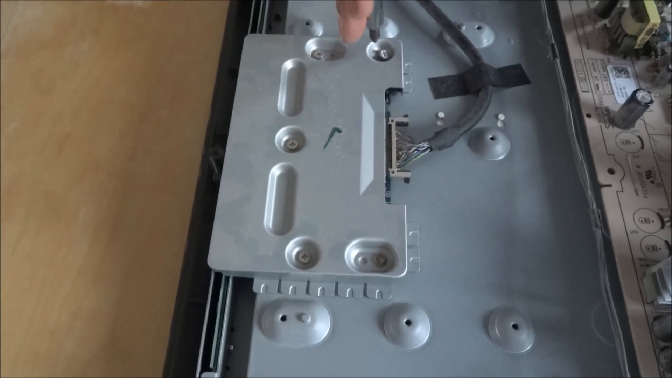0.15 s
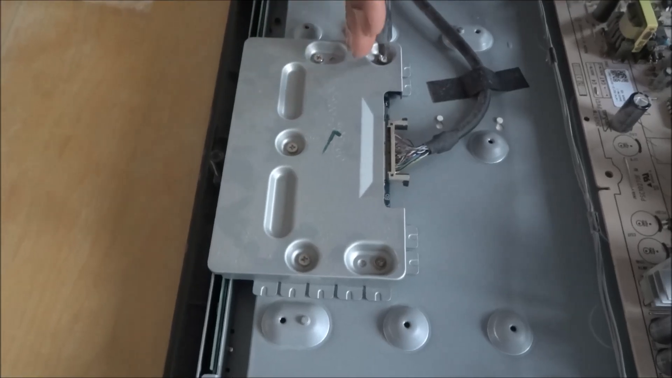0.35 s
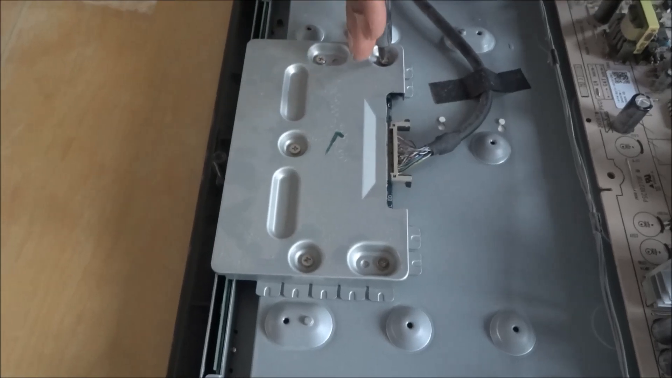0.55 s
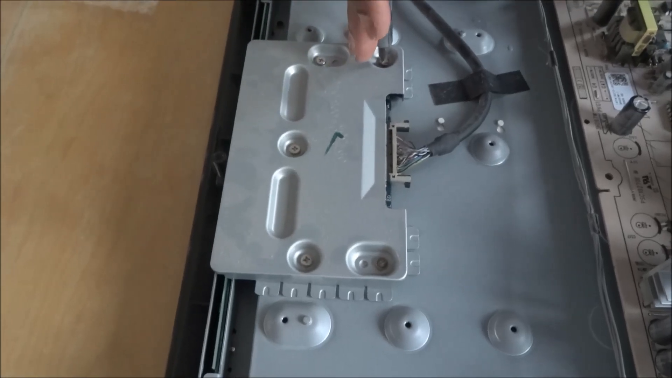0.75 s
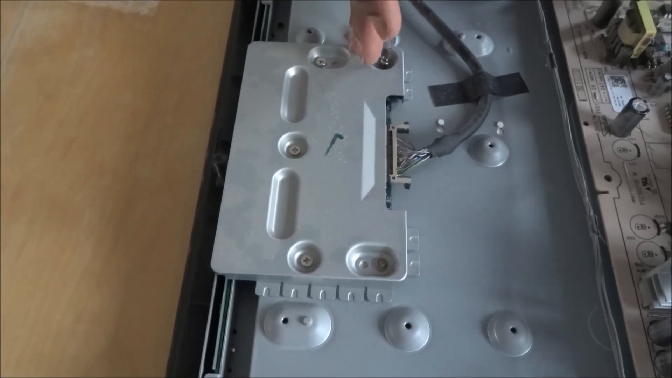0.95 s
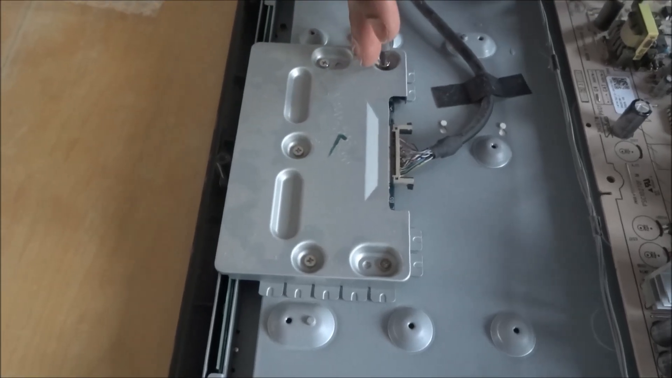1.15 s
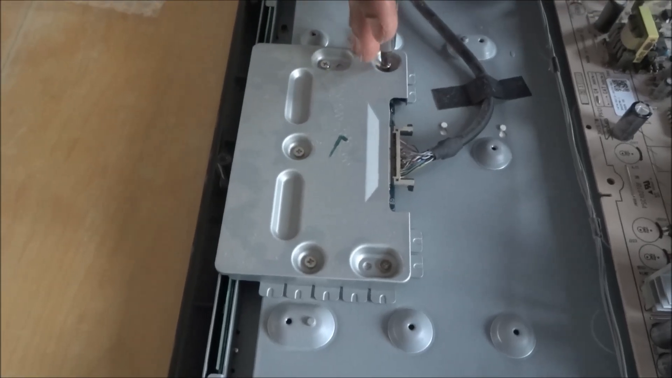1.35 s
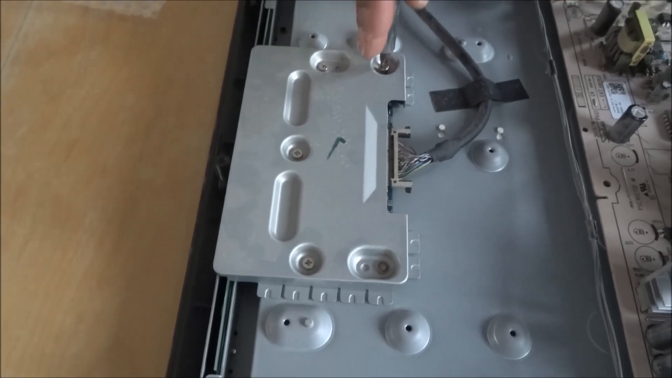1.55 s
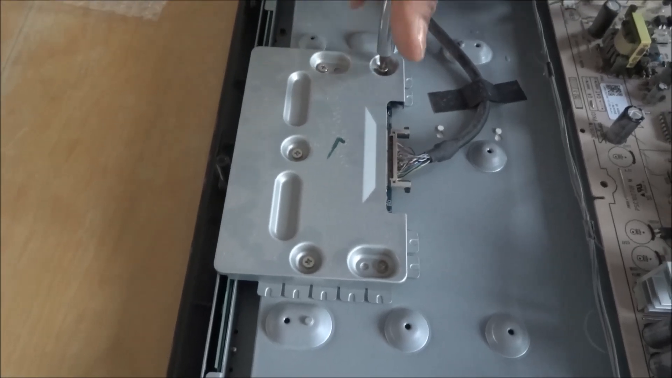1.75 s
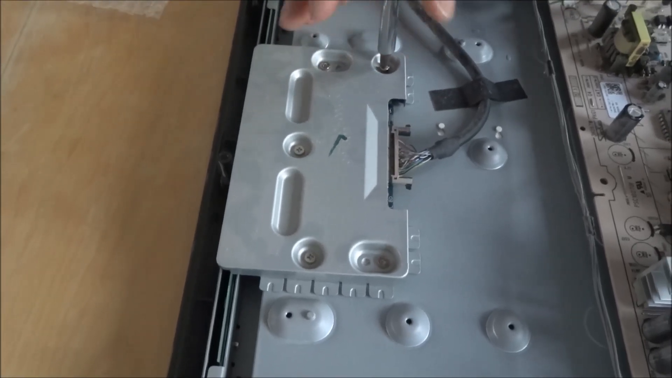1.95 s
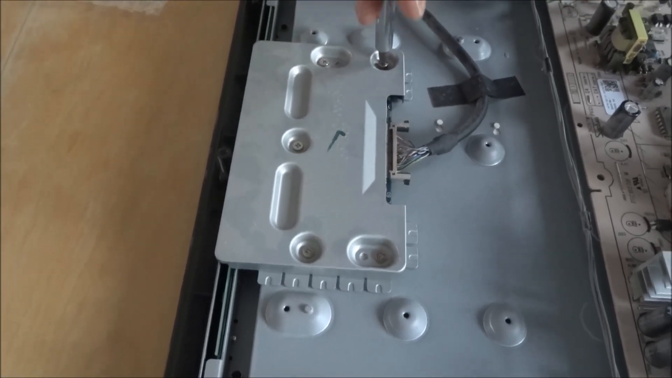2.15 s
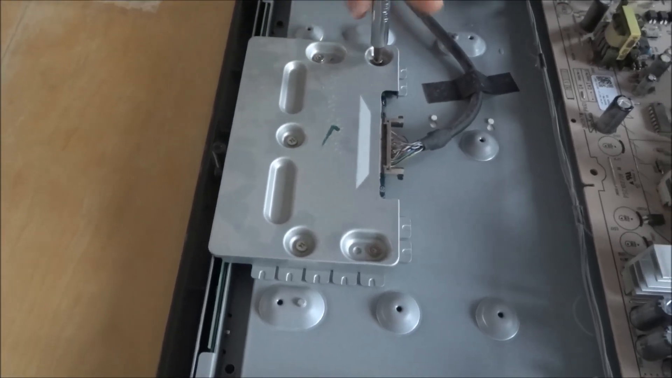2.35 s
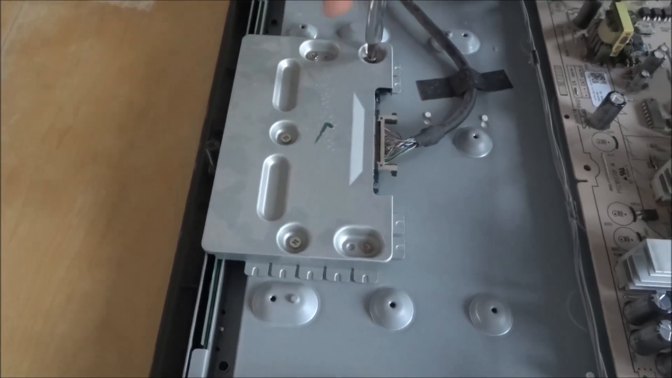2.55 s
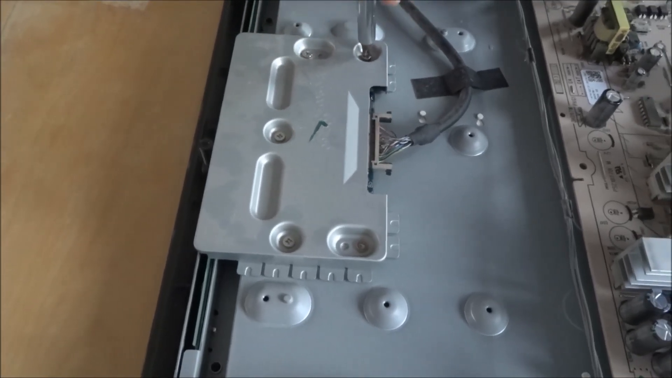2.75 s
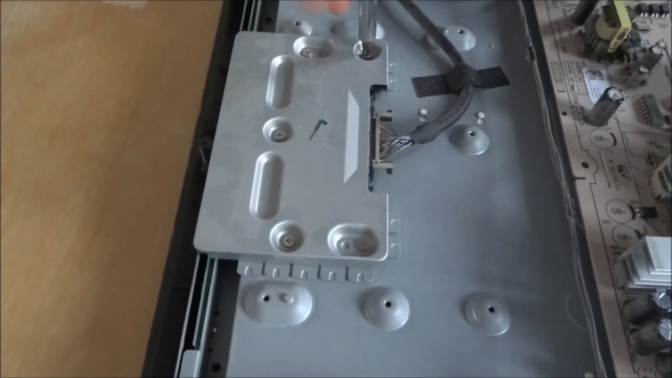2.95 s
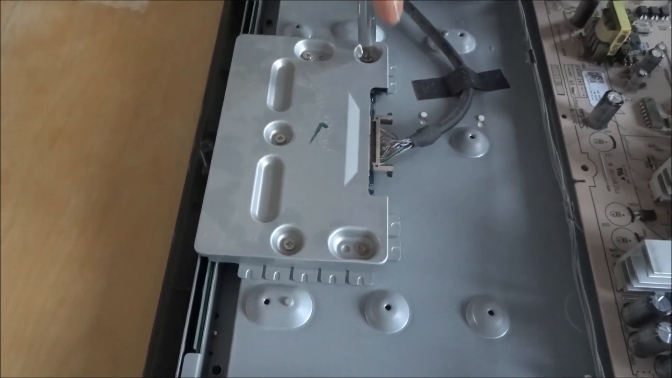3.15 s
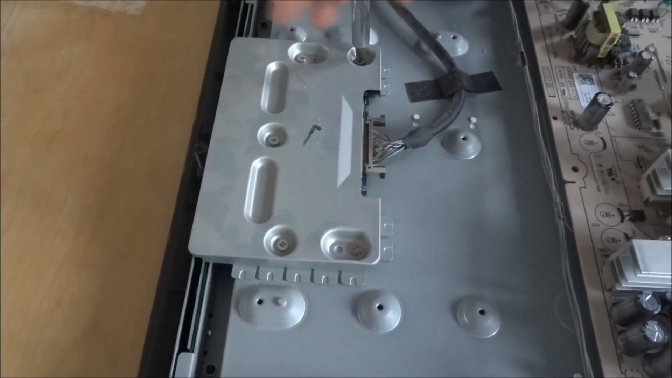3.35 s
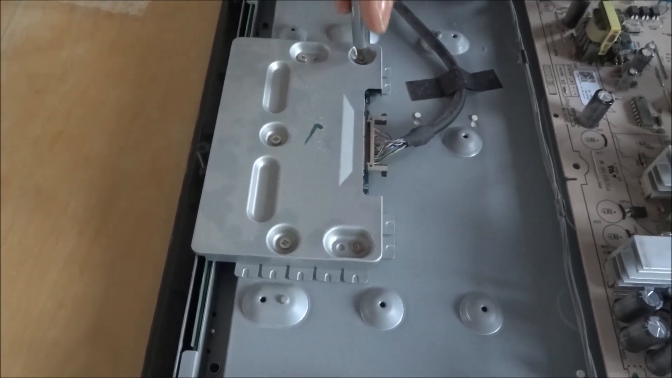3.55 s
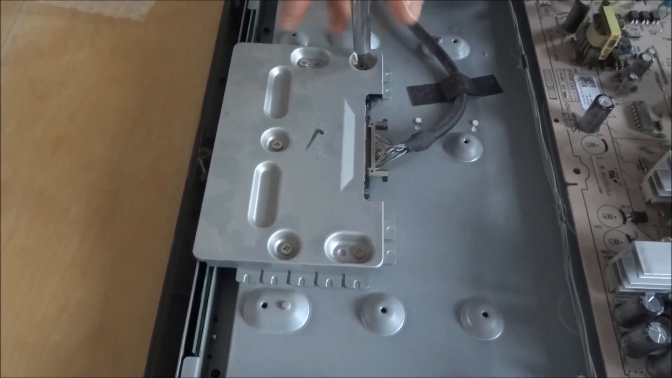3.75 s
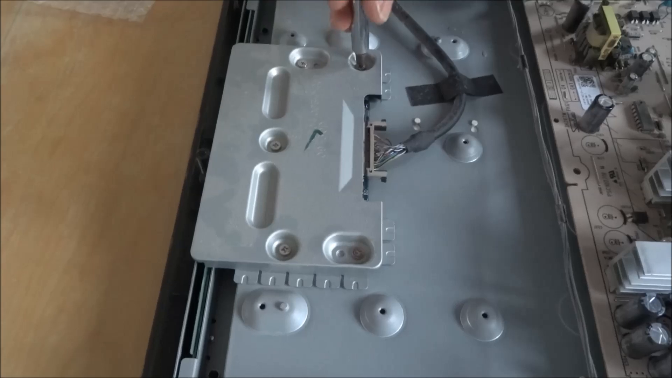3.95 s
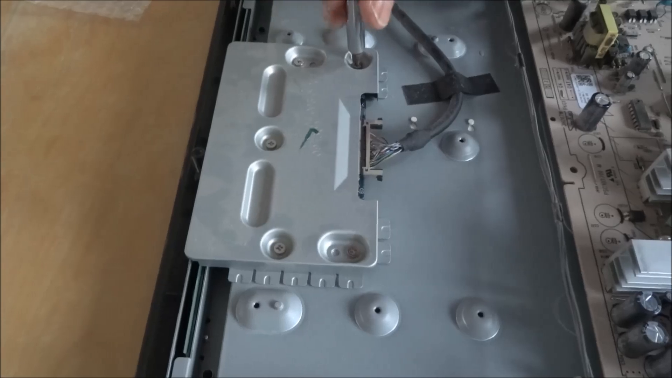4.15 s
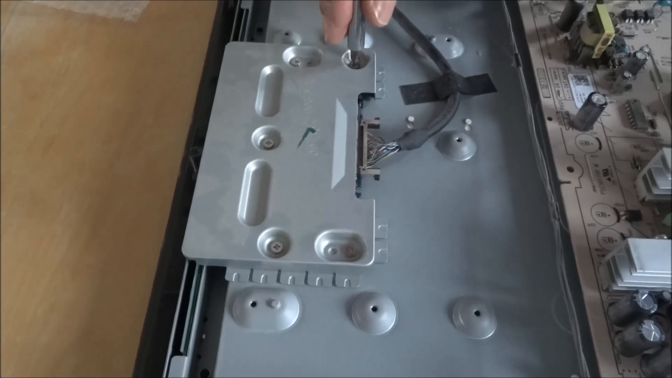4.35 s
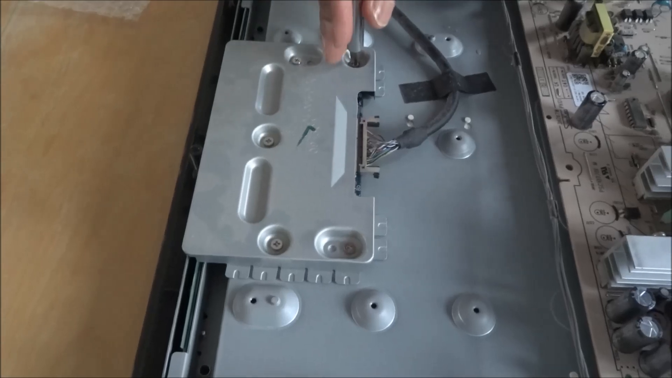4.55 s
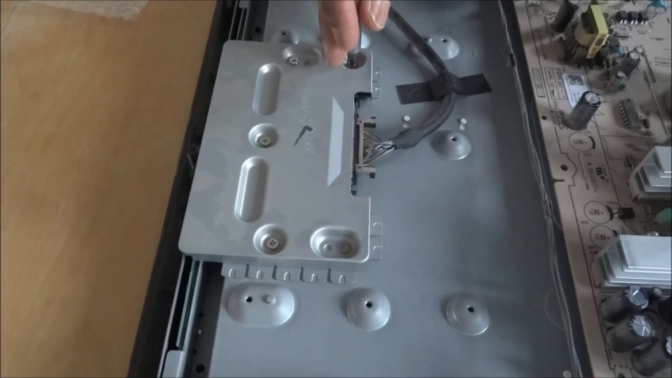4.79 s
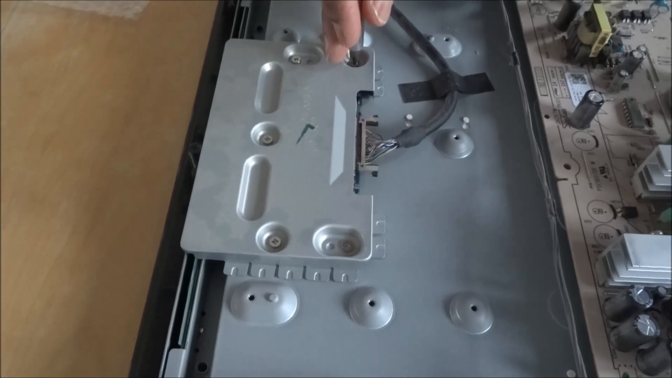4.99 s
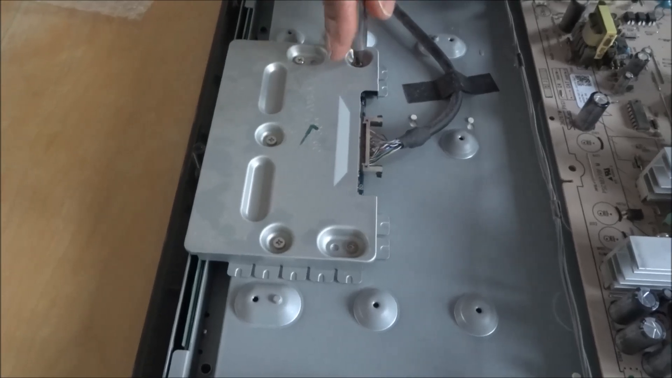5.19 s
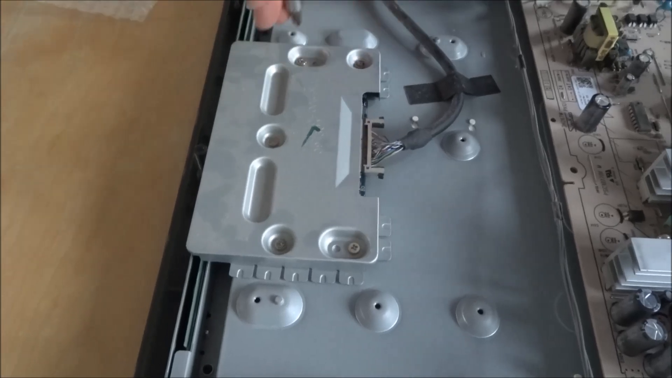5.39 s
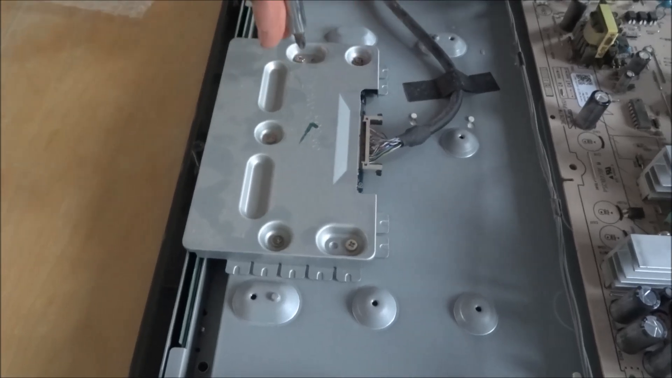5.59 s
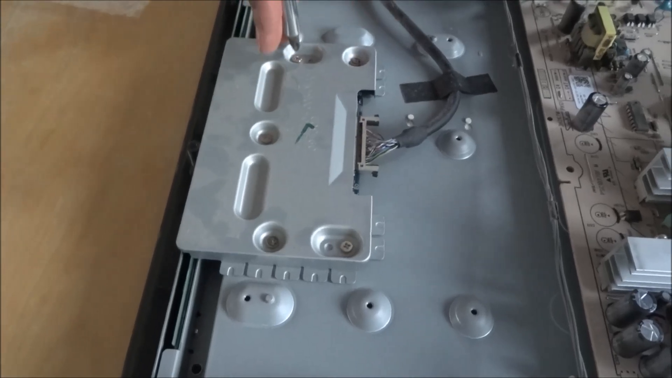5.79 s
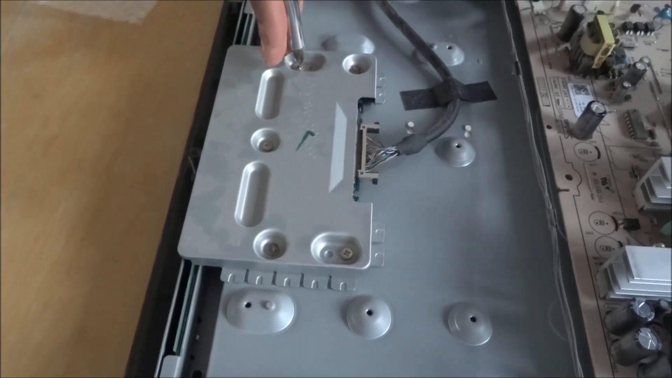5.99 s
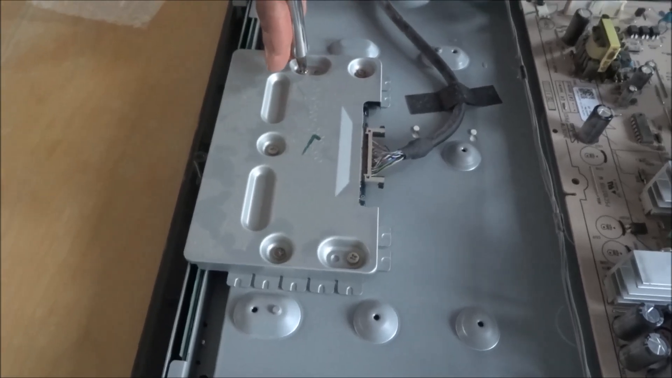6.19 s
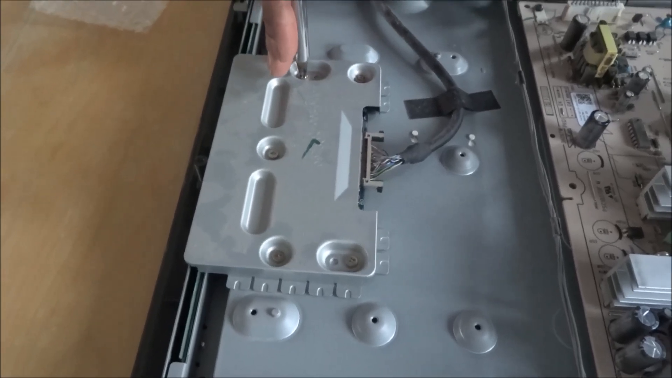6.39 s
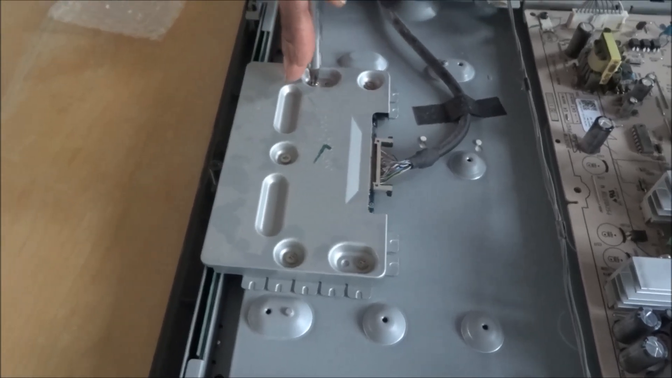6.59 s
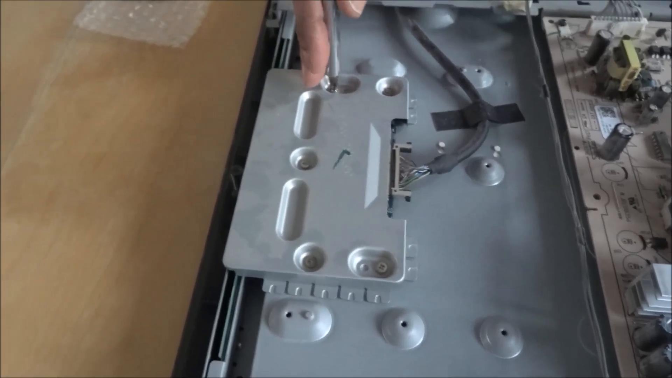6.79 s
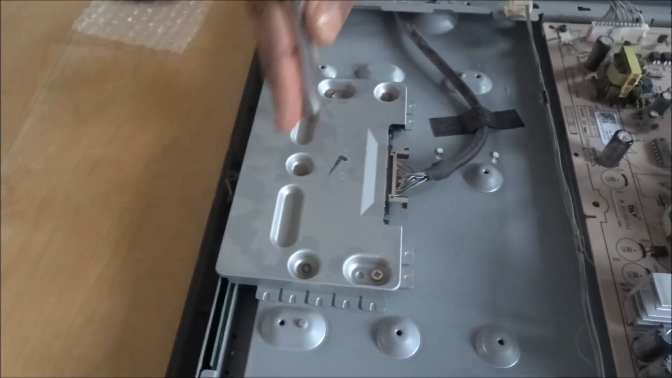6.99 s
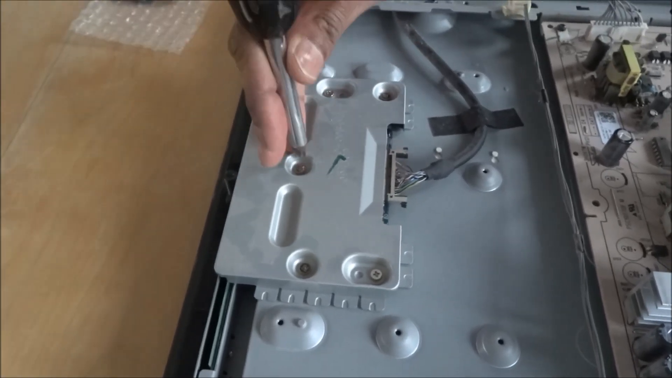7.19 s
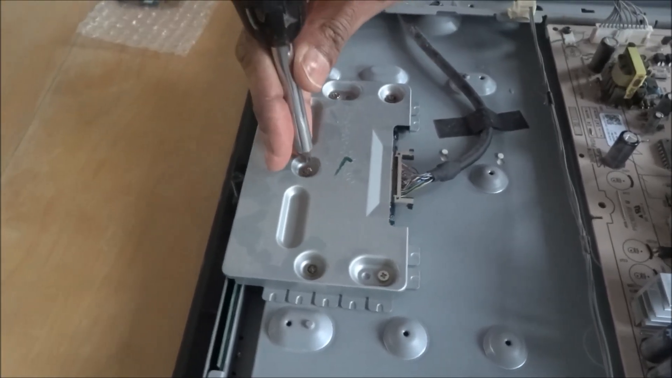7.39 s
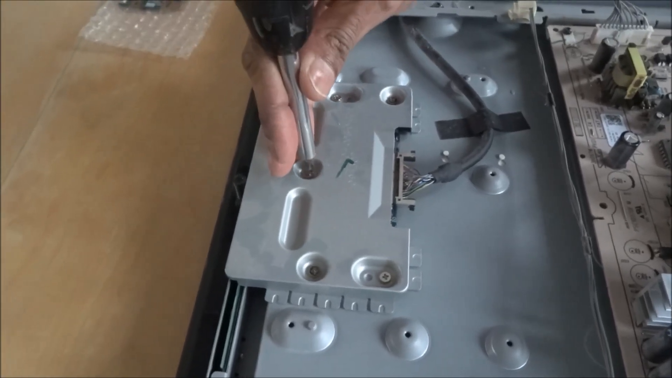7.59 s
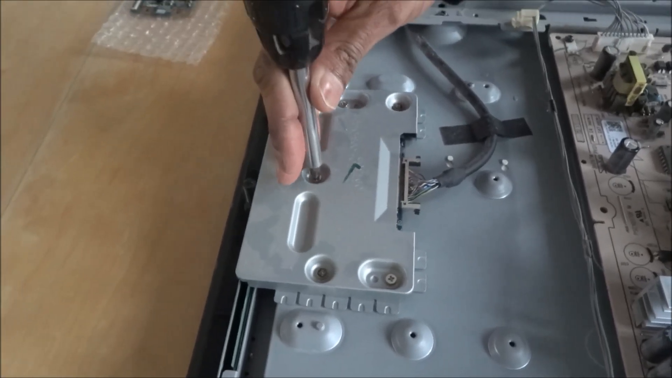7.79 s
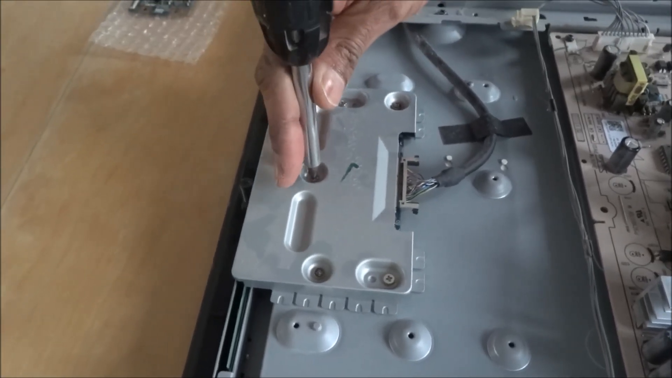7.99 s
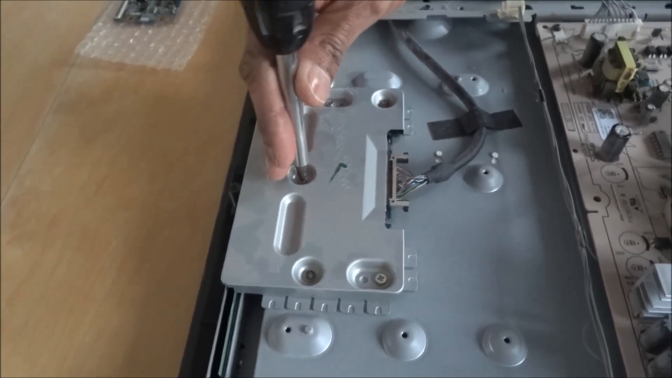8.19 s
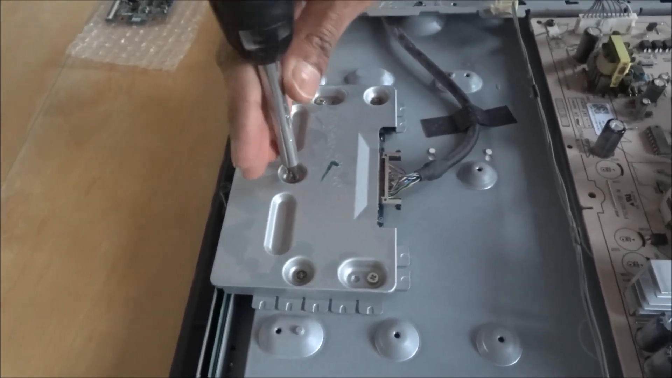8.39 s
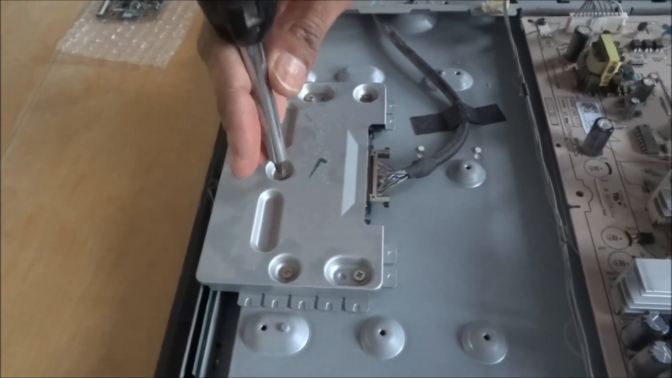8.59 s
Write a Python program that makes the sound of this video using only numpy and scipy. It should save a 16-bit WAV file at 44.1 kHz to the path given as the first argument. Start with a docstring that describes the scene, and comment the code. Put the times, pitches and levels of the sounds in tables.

```python
"""A small workshop: close to the microphone, a ratcheting screwdriver works on a thin steel plate on an open chassis.
On each back-swing the pawl snaps over the teeth in a quick run: short ringing steel modes with bright noise.
The bit knocks and scrapes in the screw heads: grainy noise ticks, plate modes that clank, chassis modes that boom.
Fingers rub the shaft as soft noise. Behind lie room air, a faint hum of steady sines and three low falling tones."""
import sys
import numpy as np
from scipy import signal
from scipy.fft import rfft, irfft
from scipy.io import wavfile
from scipy.ndimage import uniform_filter1d

SR = 44100
rng = np.random.default_rng(int(sys.argv[2]) if len(sys.argv) > 2 else 0)


def waveform_to_disk(signal):
    """Save audio, clipped to [-1, 1], as 16-bit WAV at the path in sys.argv[1]."""
    frames = np.transpose(np.atleast_2d(signal))
    scaled = np.clip(frames, -1, 1) * 32767
    samples = np.round(scaled).astype(np.int16)
    wavfile.write(sys.argv[1], SR, samples)


N = 381024
RING = np.arange(SR * 2 // 5) / SR   # time axis of one blow, s
LEFT_RIGHT = np.array([[1], [-1]])   # signs of a difference between the sides
CLICK_S, KNOCK_S, BOOM_S = .003, .012, .025   # opening spans over which clicks, knocks and booms are levelled, s
MIDDLE_SCREW_S = 7.4   # after this the bit is at the plate's middle screw, s

# Bending modes of the chassis on the bench. Each row: frequency in Hz, relative level in dB, t60 in seconds.
CHASSIS_MODES = [(69, -31, 0.11), (129.3, -14.5, 0.94), (142, -18, 0.1), (192, -11.5, 0.21),
                 (216.7, 4.5, 0.47), (242.2, -8, 0.3)]
# Back-swings of the handle. Each row: start in seconds, length in seconds, teeth passed, extra time per tooth at
# the start and at the end as shares of that at full speed, brightness in dB per octave before each tooth's own
# share, relative rocking of the chassis in dB.
BACK_SWINGS = [(1.6508, .0756, 9, .85, .71, -3, -38), (1.7388, .1059, 11, .43, 2.53, 0, -42),
               (2.1489, .1557, 14, 1.05, 2.04, 1, -37), (2.6644, .1231, 13, 1.58, 1.56, .5, -32),
               (3.0823, .1406, 15, .62, .49, 0, -30), (3.5106, .1311, 15, 1.35, .95, 0, -26),
               (3.6824, 0, 1, 0, 0, -2, -42), (3.9668, .1234, 8, -.18, .58, 1, -48),
               (4.5485, 0, 1, 0, 0, -3, -40), (4.5833, 0, 1, 0, 0, -3, -36)]


def from_db(db):
    """Decibels to gain."""
    return 10 ** (np.asarray(db) / 20)


def decay(t, t60):
    """Falls by 60 dB in t60."""
    return np.exp(-np.log(1000) / t60 * t)


def level_one(x, span):
    """Scales x to rms 1 over its first span seconds."""
    return x / np.sqrt(np.mean(x[:int(span * SR)] ** 2) + 1e-20)


def add(out, s, sound):
    """Mixes a sound in at time s."""
    i = max(int(s * SR), 0)
    out[..., i:i + sound.shape[-1]] += sound[..., :out.shape[-1] - i]


def shaped(x, points):
    """Filters x by (Hz, dB) points joined along a logarithmic frequency axis."""
    hz, db = np.transpose(points)
    f = np.maximum(np.fft.rfftfreq(len(x), 1 / SR), 1)
    gain = from_db(np.interp(np.log(f), np.log(hz), db))
    return irfft(rfft(x) * gain, len(x))


def coloured(points, size):
    """Noise whose spectrum follows (Hz, dB) points."""
    return shaped(rng.standard_normal(size), points)


def ring(t, hz, db, t60, spread_db):
    """Decaying modes; each blow shares its strength among them a little differently."""
    signs = (-1) ** np.arange(len(hz))
    gain = from_db(db + spread_db * rng.standard_normal(len(hz))) * signs
    return gain @ (np.sin(2 * np.pi * hz[:, None] * t) * decay(t, t60[:, None]))


def workshop(sound, pan_db, wet_db, t60=.33, build_s=0.0014, echo_s=.0138, echo=0.17, port_lead=0.18):
    """Direct sound, one early reflection and a diffuse tail, new for each blow because the hands keep moving."""
    # Reverberation shared by both sides. Each row: frequency in Hz, relative level in dB.
    room_colour = [(60, -36), (220, -12), (400, 8.5), (1500, 2), (3000, -4), (6000, -7.5), (10000, -7),
                   (16000, -2.5)]
    # Reverberation that differs between the sides. Each row: frequency in Hz, relative level in dB.
    room_width = [(60, -51), (220, -40), (500, -13.5), (2000, -18.5), (6000, -16.5), (13000, -23)]
    t = RING[:SR // 4]
    envelope = decay(t, t60) * (1 - np.exp(-t / build_s))
    envelope = from_db(wet_db) * envelope / np.sqrt(np.sum(envelope ** 2))
    shared = coloured(room_colour, len(t))
    differing = coloured(room_width, len(t))
    paths = envelope * (shared + LEFT_RIGHT * differing)
    paths[:, 1] += 1   # direct sound
    # the left port hears it a fraction of a sample before the right
    paths[:, :3] += port_lead / 2 * LEFT_RIGHT * [1, 0, -1]
    paths[:, int(echo_s * SR)] += echo
    return signal.fftconvolve(sound[None], paths, axes=1) * from_db(pan_db * LEFT_RIGHT)


def background(air_db=-45.5, beat_db=-52.5, beat_period_s=1.041, beat_crest_s=0.3):
    """Room air and hum; a motor running just under the mains hum beats slowly against it."""
    # Colour of the room air. Each row: frequency in Hz, relative level in dB per Hz.
    air_colour = [(15, -90), (25, -16), (69, -6), (86, -10), (152, -3.5), (340, -7.5), (399, -15.5),
                  (445, -13), (482, -12.5), (552, -14), (804, -17.5), (1850, -28.5), (2170, -26),
                  (2560, -29.5), (15500, -38)]
    # Air that differs between the sides. Each row: frequency in Hz, level against the shared part in dB.
    air_width = [(100, -29), (220, -21), (450, -11.5), (1000, -4), (3000, -4.5), (6000, -8.5), (12000, -19)]
    # Steady machine hum. Each row: frequency in Hz, rms level in dB.
    hum_tones = [(135, -51.5), (157, -50.5), (193, -49.5)]
    t = np.arange(N) / SR
    mid, side = (level_one(coloured(air_colour, N), N / SR) for _ in range(2))
    air = from_db(air_db) * (mid + shaped(side, air_width) * LEFT_RIGHT)
    hum = sum(from_db(db) * np.sin(2 * np.pi * (hz * t + rng.random())) for hz, db in hum_tones)
    mains = 2 * np.pi * 100 * t
    motor = mains - 2 * np.pi * (t - beat_crest_s) / beat_period_s
    pair = np.sin(mains) + np.sin(motor)
    return air + np.sqrt(2) * (hum + from_db(beat_db) * pair)   # root two turns rms levels into peaks


def contact(drag, slips_per_s=2200, slip=0.3):
    """Force of the bit: a first touch, then tiny slips that die away as it settles."""
    t = RING[:SR // 12]
    slips = (rng.random(len(t)) < slips_per_s / SR) * rng.standard_normal(len(t))
    force = slip * slips * np.exp(-t / drag)
    force[0] = 1
    return force


def clank(drag, middle, low_db, high_db, dense_db=2.5, dense_s=0.0054, drag_share=1.0, split_hz=950):
    """The plate: a few clear modes among many dense ones, levelled separately below and above the split."""
    # Modes of the plate. Each row: frequency in Hz, t60 in seconds, relative level in dB struck at its edge,
    # relative level in dB struck at its middle screw.
    plate_modes = [(305.2, 0.48, -2, -5), (342, 0.092, -3, 4.5), (396, 0.11, -4.5, 1.5),
                   (444, 0.069, 1.5, 1.5), (524, 0.091, -4, -9), (622, 0.06, -3, -9),
                   (768.6, 0.12, -10, -8.5), (856, 0.075, -11.5, -21), (1160, 0.042, -8, -8),
                   (1276, 0.04, -7.5, -0.5), (1386, 0.035, -7.5, 0.5), (1550, 0.03, -14, -6)]
    # Colour of the dense, short-lived modes. Each row: frequency in Hz, relative level in dB per Hz.
    clank_colour = [(150, 3.5), (300, 21), (500, 5), (1000, -9.5), (1350, -8.5), (1700, -3.5), (2200, -0.5),
                    (3200, -4), (5000, -34)]
    t = RING[:SR // 5]
    hz, t60, edge_db, middle_db = np.transpose(plate_modes)
    answer = ring(t, hz, middle_db if middle else edge_db, t60, spread_db=0.5)
    modes = signal.fftconvolve(contact(drag), answer)[:len(t)]
    # the dense modes are fed for as long as the bit drags
    dense = coloured(clank_colour, len(t)) * np.exp(-t / (dense_s + drag_share * drag))
    plate = level_one(modes, KNOCK_S) + from_db(dense_db) * level_one(dense, KNOCK_S)
    low = signal.sosfilt(signal.butter(4, split_hz, "low", fs=SR, output="sos"), plate)
    high = signal.sosfilt(signal.butter(4, split_hz, "high", fs=SR, output="sos"), plate)
    return from_db(low_db) * level_one(low, KNOCK_S) + from_db(high_db) * level_one(high, KNOCK_S)


def tick(drag, ring_s=0.0022, drag_share=0.92, grain_db=3.5):
    """Steel on steel: a bright grainy crack that lasts longer the longer the bit drags."""
    # Colour of the crack. Each row: frequency in Hz, relative level in dB per Hz.
    tick_colour = [(1200, -15), (2400, 0), (3300, 4.5), (4300, -3), (5300, 3), (7000, -3.5), (11300, -7),
                   (13000, -32), (16000, -50)]
    t = RING[:SR // 10]
    grain = from_db(grain_db * np.repeat(rng.standard_normal(len(t) // 30), 30))   # a new level every 30 samples
    fade = np.exp(-t / (ring_s + drag_share * drag))
    return level_one(coloured(tick_colour, len(t)) * grain * fade, KNOCK_S)


def boom(middle, swell_s=0.0016, finger_damping=0.78, thud_db=-8.0, thud_t60=0.14):
    """The chassis swells into its low modes over a dull thud of the bench; a finger by the middle screw damps them."""
    # Colour of the thud. Each row: frequency in Hz, relative level in dB per Hz.
    thud_colour = [(30, -34), (70, -12.5), (130, -16.5), (250, 0), (400, -19), (900, -55)]
    hz, db, t60 = np.transpose(CHASSIS_MODES)
    damping = finger_damping if middle else 1
    modes = level_one(ring(RING, hz, db, t60 * damping, spread_db=5.0), BOOM_S)
    thud = level_one(coloured(thud_colour, len(RING)) * decay(RING, thud_t60), BOOM_S)
    swell = 1 - np.exp(-RING / swell_s)
    return level_one((modes + from_db(thud_db) * thud) * swell, BOOM_S)


def strike(s, clank_db, tick_db, drag, plate_db=0.5, steel_db=-.5):
    """One contact of the bit: a steel tick and a clank whose upper modes grow with hardness and force."""
    upper_share, upper_lift_db = 0.56, 2   # upper modes lie this share of the way from clank to tick, plus a lift
    lift_per_db, usual_clank_db = 0.1255, -24.5   # lift in dB per dB of clank above an ordinary knock
    middle_lift_db = 2.5   # struck at its middle screw, the plate rings brighter
    middle = s > MIDDLE_SCREW_S
    lift_db = upper_lift_db + lift_per_db * (clank_db - usual_clank_db) + middle_lift_db * middle
    upper_db = clank_db + upper_share * (tick_db - clank_db) + lift_db
    sound = from_db(plate_db) * clank(drag, middle, clank_db, upper_db)
    add(sound, 0, from_db(tick_db + steel_db) * tick(drag))
    return s, sound


def rock(s, db, chassis_db=-1.5):
    """A push on the chassis sets it booming."""
    return s, from_db(db + chassis_db) * boom(s > MIDDLE_SCREW_S)


def touch(s, db, clank_db=-13.5, drag_s=0.0026):
    """A light contact, nearly all tick: the plate hardly answers."""
    return strike(s, db + clank_db, db, drag_s)


def handling(push_share=.1, release_s=0.014, seat_drag_s=0.0031):
    """Everything the bit and the swings do to screw, plate and chassis, but for the thump, as (s, sound)."""
    # The bit knocks or scrapes on screw and plate. Each row: time in seconds, relative levels of boom, clank and
    # tick in dB, time constant of the bit's drag in seconds.
    knock_rows = [(.518, -25.5, -27, -42.5, 0.0021), (1.339, -11, -18.5, -20, 0.0012),
                  (1.669, -15.5, -30, -29.5, 0.002), (1.918, -24, -42.5, -24.5, 0.0022),
                  (1.9866, -56, -36, -25, 0.0022), (2.018, -44, -38.5, -31.5, .0023),
                  (2.3899, -24, -41, -31.5, 0.0007), (2.415, -38, -38, -18.5, 0.0026),
                  (2.463, -44, -32.5, -35, 0.0015), (2.495, -33.5, -38, -26, 0.0011),
                  (3.322, -38, -37.5, -33, 0.0047), (4.389, -34, -45, -40.5, 0.0091),
                  (4.488, -11.5, -13, -27.5, .0045), (5.076, -34, -42, -29.5, 0.0044),
                  (5.259, -28, -44, -53, 0.004), (5.7612, -62, -49, -51, .002),
                  (6.0804, -16.5, -18.5, -41, .003), (6.3519, -17.5, -17, -30, 0.0014),
                  (6.5752, -33, -35, -31.5, 0.002), (6.8709, -38.5, -40, -34, .0033),
                  (7.234, -62, -54, -55, 0.038), (7.5531, -22, -16.5, -29, 0.002),
                  (7.8403, -16, -15.5, -49, 0.0014), (8.0422, -35, -34.5, -52, .0025),
                  (8.076, -39, -40.5, -43, 0.021), (8.5287, -29, -23.5, -45, .0008)]
    # The bit lands on a screw head, slides and drops into the recess. Each row: time of the drop in seconds,
    # slide before it in seconds, relative levels of boom, clank and tick in dB.
    seatings = [(.922, .019, -17.5, -28.5, -30.5), (1.022, .014, -23.5, -36.5, -42.5),
                (1.068, .006, -18, -25.5, -27), (1.161, .011, -13, -28, -31.5),
                (2.884, .019, -32, -38.5, -29.5), (4.2017, .0103, -19.5, -35, -25),
                (4.3389, .0125, -21, -33.5, -32), (4.7468, .029, -33, -39.5, -29.5),
                (6.2064, .029, -21, -25, -29.5), (7.739, .0173, -14.5, -14.5, -28),
                (8.4656, .029, -29.5, -33, -38)]
    # Light touches of the shaft, many taking up the tool's play just before a run. Each row: time in seconds,
    # relative tick level in dB.
    touches = [(1.63, -36.5), (2.093, -45), (2.645, -32.5), (3.06, -39.5), (3.4688, -46), (3.794, -42),
               (3.942, -38), (4.443, -46.5), (4.779, -48), (5.113, -46), (5.289, -45.5), (5.418, -52),
               (5.4889, -53.5), (7.008, -39.5), (8.497, -37.5)]
    # the landing is softer than the drop; it drags for this share of the slide
    landing_clank_db, landing_tick_db, slide_share = -4, -10, 0.64
    for s, boom_db, clank_db, tick_db, drag in knock_rows:
        yield strike(s, clank_db, tick_db, drag)
        yield rock(s, boom_db)
    for s, slide, boom_db, clank_db, tick_db in seatings:
        landing = s - slide
        yield strike(landing, clank_db + landing_clank_db, tick_db + landing_tick_db, slide_share * slide)
        yield rock(landing + push_share * slide, boom_db)
        yield strike(s, clank_db, tick_db, seat_drag_s)
    for s, db in touches:
        yield touch(s, db)
    for start, length, *_, rock_db in BACK_SWINGS:
        yield rock(start + length + release_s, rock_db)   # the hand lets up at the end of the swing


def knocks(wet_db=-6.0):
    """Ticks, clanks and booms ring out in the workshop; one thump rocks the whole chassis and rattles the plate."""
    # As the screw bottoms out the chassis thumps on the bench, a little to the left. In order: time in seconds,
    # relative boom level in dB, pan to the left in dB.
    thump_row = (4.499, -8.5, 1.3)
    # The plate rattles with it. In order: low modes in dB, high modes in dB, time constant in seconds.
    thump_rattle = (-25, -23, 0.0037)
    out = np.zeros((2, N))
    for s, sound in handling():
        add(out, s, workshop(sound, pan_db=0.3, wet_db=wet_db))
    s, boom_db, pan_db = thump_row
    low_db, high_db, rattle_s = thump_rattle
    _, thump = rock(s, boom_db)
    add(thump, 0, clank(rattle_s, False, low_db, high_db))
    add(out, s, workshop(thump, pan_db, wet_db))
    return out


def fingers(grain_db=2.5, fade_s=0.049):
    """Skin rubs unevenly on the shaft while the tool is guided into a screw head."""
    # Fingers sliding along the shaft. Each row: start in seconds, length in seconds, relative level in dB.
    rubs = [(0.903, .46, -51), (1.33, .15, -44.5), (5.038, 0.31, -73), (6.933, 0.21, -53),
            (7.115, 2.8, -56), (7.86, .33, -54)]
    # Colour of the rubbing. Each row: frequency in Hz, relative level in dB per Hz.
    rustle_colour = [(800, 9), (2500, 1), (6000, -2.5), (11000, -0.5), (15000, -21)]
    t = np.arange(N) / SR
    grain = level_one(uniform_filter1d(rng.standard_normal(N), size=300), N / SR)
    level = np.zeros(N)
    for s, length, db in rubs:
        nearest_end = np.minimum(t - s, s + length - t)
        level += from_db(db) * np.clip(nearest_end / fade_s, 0, 1)
    return level * from_db(grain_db * grain) * level_one(coloured(rustle_colour, N), N / SR)


def tooth_times(start, length, teeth, slow_start, slow_end):
    """The wrist gets up to speed, and brakes again, within a few teeth, so the gaps change at both ends."""
    speed_up_teeth, brake_teeth = 2.683, 1.615
    k = np.arange(round(teeth) - 1)
    gaps = 1 + slow_start * np.exp(-k / speed_up_teeth) + slow_end * np.exp(-k[::-1] / brake_teeth)
    return start + length * np.append(0, np.cumsum(gaps) / gaps.sum())


def snap(tilt_db, hiss_db=-2.0, hiss_t60=0.011, bounce=1.0, bounce_s=0.00088, detune=0.015):
    """The pawl drops on a tooth and bounces once; the hand damps the steel within milliseconds."""
    # Modes of the screwdriver. Each row: frequency in Hz before detuning, relative level in dB before the tilt,
    # t60 in seconds.
    tool_modes = [(3010, -9, 0.017), (3230, -12, 0.021), (5250, 3.5, 0.0082), (5800, 1, 0.0074),
                  (6680, 2.5, 0.01), (7490, 7, 0.0082), (7865, 7.5, 0.0076), (9300, -2.5, 0.0081),
                  (10500, -3.5, 0.0085), (11980, -24, .008)]
    # Colour of the dense, short-lived modes. Each row: frequency in Hz, relative level in dB per Hz.
    snap_colour = [(300, -14.5), (1000, -17.5), (1800, -10.5), (2800, 4.5), (4300, -1), (5500, 5),
                   (8000, -0.5), (11500, 2.5), (13500, -10.5), (16000, -18)]
    t = RING[:SR // 40]
    hz, db, t60 = np.transpose(tool_modes)
    tilted = db + tilt_db * np.log2(hz / hz.mean())
    detuned = hz * (1 + detune * rng.standard_normal(len(hz)))
    steel = level_one(ring(t, detuned, tilted, t60, spread_db=1.0), CLICK_S)

    def hit():
        """The same steel modes with fresh hiss."""
        hiss = coloured(snap_colour, len(t)) * decay(t, hiss_t60)
        return steel + from_db(hiss_db) * level_one(hiss, CLICK_S)

    click = hit()
    add(click, bounce_s * rng.uniform(.5, 1.4), bounce * hit())
    return level_one(click, CLICK_S)


def ratchet(level_db=-13.0, shake_db=-46.5, lean_db=2.0, usual_gap_s=0.01, brighten_db=4.5):
    """Runs of pawl clicks, all driven by the same spring; each nudges the chassis, more as the hand leans in."""
    out = np.zeros((2, N))
    hz, db, t60 = np.transpose(CHASSIS_MODES)
    shake = from_db(shake_db + db) @ (np.sin(2 * np.pi * hz[:, None] * RING) * decay(RING, t60[:, None]))
    for *swing, tilt_db, _ in BACK_SWINGS:
        times = tooth_times(*swing)
        # a pawl that has had time to settle snaps brighter than one that is hurried
        settled = np.clip(np.log2(np.diff(times, prepend=0) / usual_gap_s), -1, 1)
        for s, rest, lean in zip(times, settled, np.linspace(-1, 1, len(times))):
            click = from_db(level_db) * snap(tilt_db + brighten_db * rest)
            add(out, s, workshop(click, pan_db=-0.5, wet_db=-2.5))
            add(out, s, from_db(lean_db * lean) * shake)
    return out


def falling_tones():
    """Faint low sines that fade in, sink and fade out."""
    # Each row: start in seconds, length in seconds, first and last frequency in Hz, rms level at the crest in dB.
    tone_rows = [(5.3, 0.41, 305, 233, -47), (6.5, 0.41, 219, 151, -50), (6.9, 0.36, 175, 126.7, -54.5)]
    out = np.zeros(N)
    for s, length, from_hz, to_hz, db in tone_rows:
        hz = np.geomspace(from_hz, to_hz, int(length * SR))
        fade = np.sqrt(2 * np.hanning(len(hz)))
        add(out, s, from_db(db) * fade * np.sin(2 * np.pi * np.cumsum(hz) / SR))
    return out


def scene():
    """Tool and plate lie close in front of the microphone, over the sounds of the room."""
    return background() + knocks() + fingers() + ratchet() + falling_tones()


def record(dry):
    """The microphone loses the deepest bass, the loudest peaks are rounded and the top is cut."""
    lean = signal.sosfilt(signal.butter(2, 32, "high", fs=SR, output="sos"), dry)
    rounded = lean / (1 + (lean / .95) ** 4) ** (1 / 4)   # never passes .95 of full scale
    return signal.sosfilt(signal.ellip(10, .1, 80, 15900, fs=SR, output="sos"), rounded)


dry = scene()
out = record(dry)
waveform_to_disk(out)
```